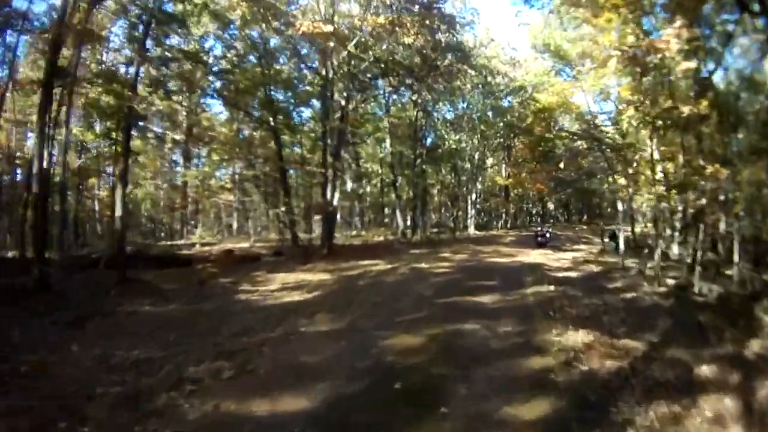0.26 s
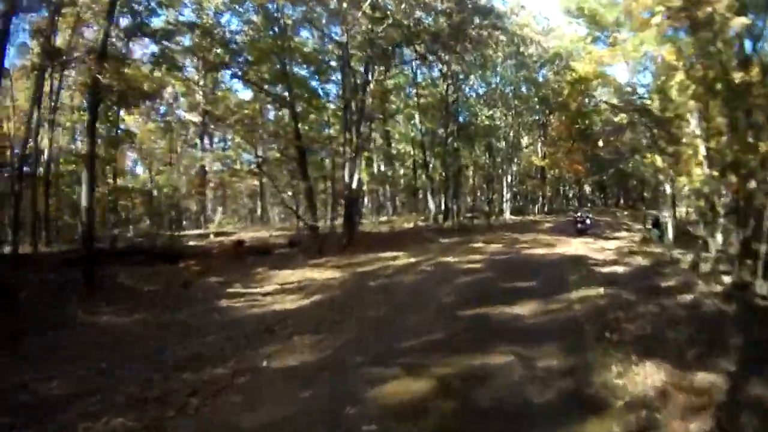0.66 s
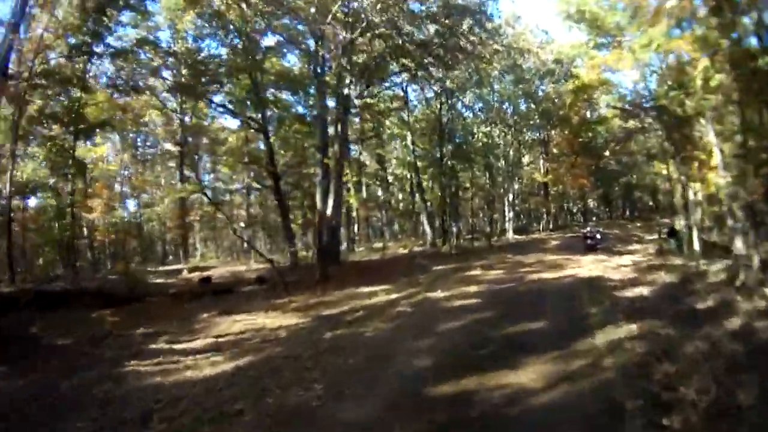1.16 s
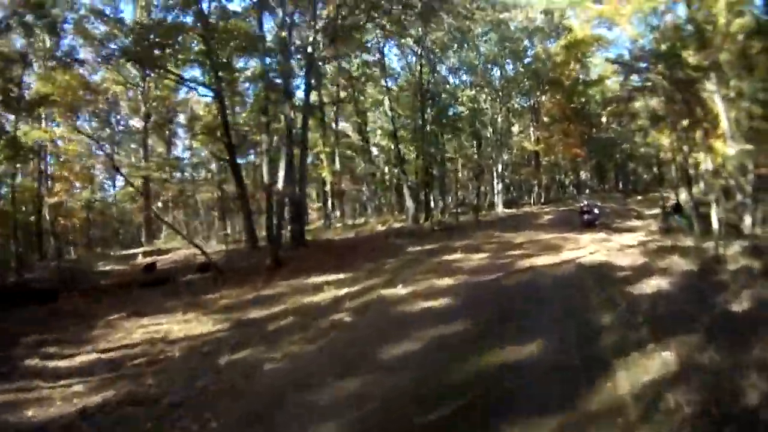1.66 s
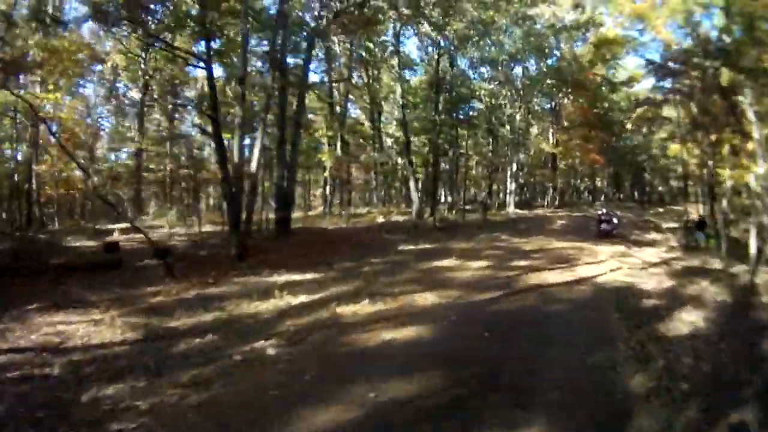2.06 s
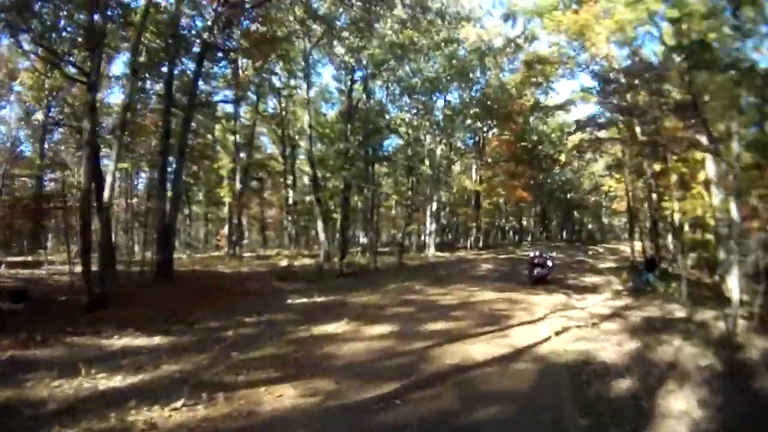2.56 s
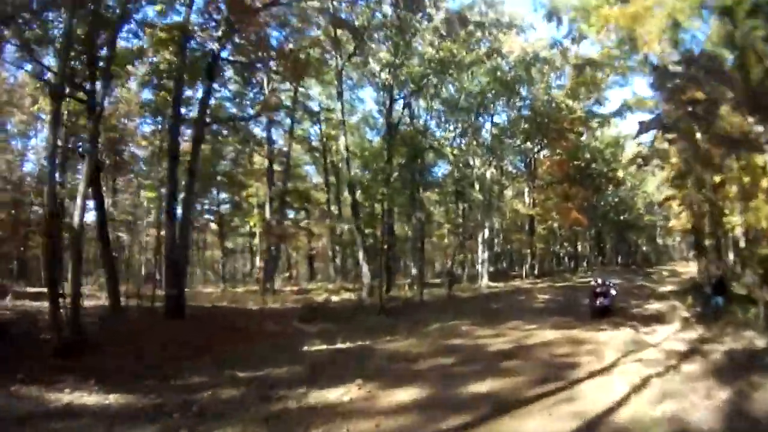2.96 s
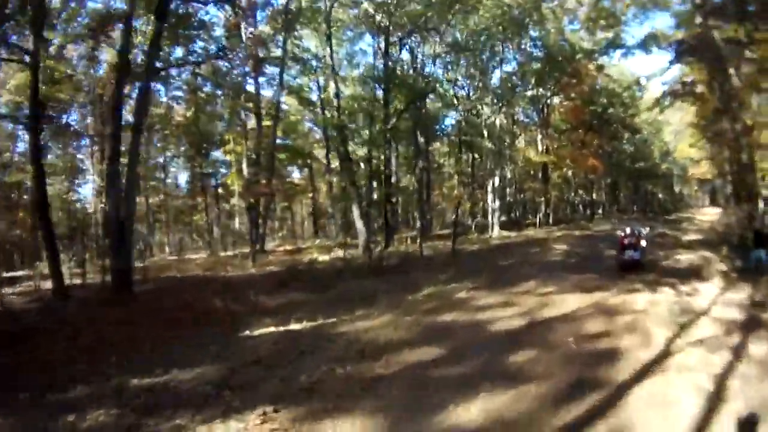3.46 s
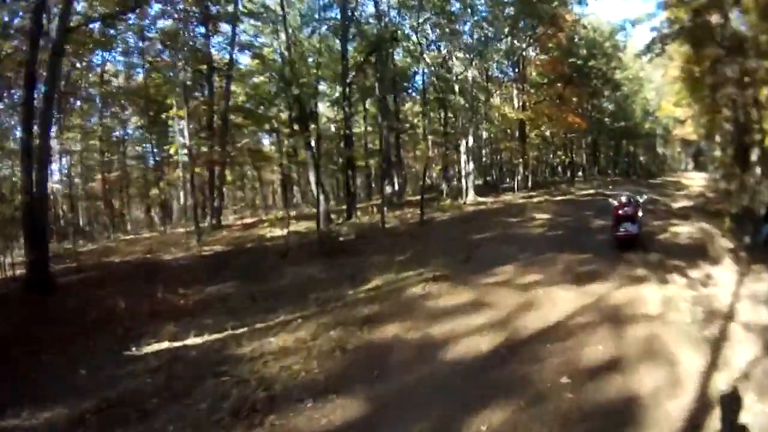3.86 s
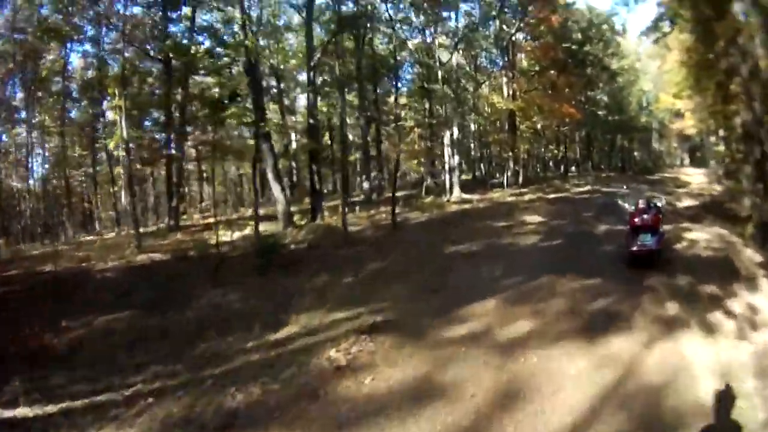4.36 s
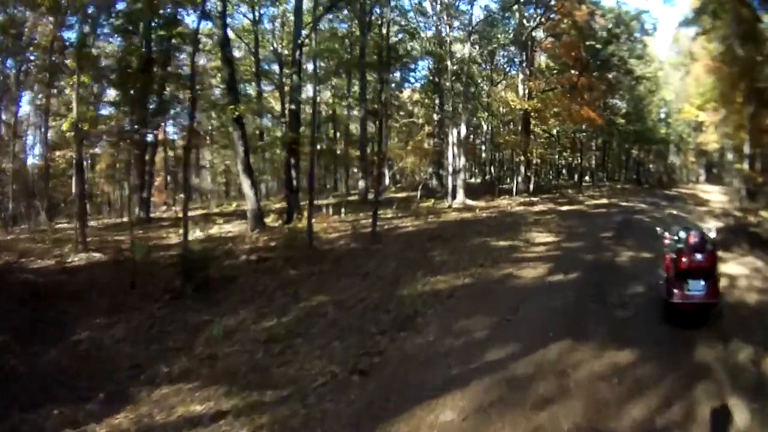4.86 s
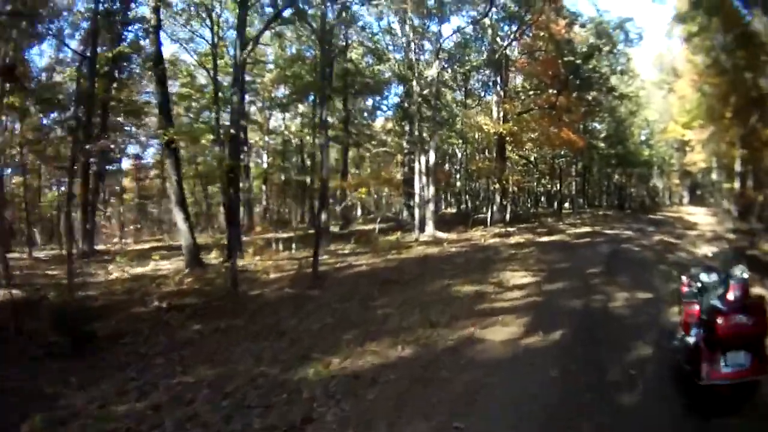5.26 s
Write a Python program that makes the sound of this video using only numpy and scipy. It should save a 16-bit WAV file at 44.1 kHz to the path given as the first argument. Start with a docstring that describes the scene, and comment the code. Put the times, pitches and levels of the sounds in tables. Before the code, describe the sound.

A bicycle rolls along a leafy dirt road in open woods, heard close from a camera carried on it. Low tyre drumming and leaf crunch start fairly quietly, then surge over rough patches from under one second to past two. A lull ends in a hard clack of loose parts near three seconds, with loud pebble knocks and leaf snaps, then calmer uneven rolling. Faint wind rumble and camera hiss lie underneath.

```python
"""The tyres of a bicycle drum over grit and crush dry leaves in surges on a dirt road in the woods,
heard from a camera that rides on it: dense random impacts excite the spectra of tyre and leaf.
Snapping leaves, pebbles, clacking loose parts and squeaks are short filtered or modulated events; ruts
give low pulses. Air rumbles on the microphone as shaped noise, and the camera adds hiss, a thin
steady whine and faint lens-motor buzzes below its band limit."""
import sys
import numpy as np
from scipy import signal
from scipy.fft import rfft, irfft, next_fast_len
from scipy.io import wavfile
from scipy.ndimage import map_coordinates

SR = 44100
rng = np.random.default_rng(int(sys.argv[2]) if len(sys.argv) > 2 else 0)


def int16_out(signal):
    """Quantize to a 16-bit WAV file."""
    q = np.round(np.clip(np.atleast_2d(signal).T, -1, 1) * 32767)
    wavfile.write(sys.argv[1], SR, q.astype(np.int16))


N = 242814  # length in samples

# Spectrum of crushed leaves. Each row: frequency in Hz, relative level in dB per Hz.
CRUNCH_SPECTRUM = [(200, -33.5), (700, 9.5), (1100, 0), (1450, 3.5), (1800, -3.5), (2200, -5.5),
                   (2520, -3.5), (2750, -11.5), (3050, -12.5), (3450, -23.5), (4100, -20), (5000, -33),
                   (9000, -37.5), (15000, -77)]
# Harder thrum of a loaded tyre. Each row: frequency in Hz, relative level in dB per Hz.
THRUM_SPECTRUM = [(100, -48), (300, -7), (470, 1), (620, 2.5), (800, -4), (1000, -13.5), (1400, -22),
                  (3000, -69.5)]


def amp(db):
    """Level to amplitude: 20 dB is a factor of ten."""
    return 10 ** (np.asarray(db) / 20)


def unit(x):
    """Normalisation to a root-mean-square value of 1."""
    return x / np.sqrt(np.mean(x ** 2) + 1e-20)


def curves(rows):
    """Linear interpolation in time: one value per sample for each column after the time."""
    times, *columns = np.transpose(rows)
    t = np.arange(N) / SR
    return [np.interp(t, times, column) for column in columns]


def wobble(rate):
    """Band-limited random modulation: a smooth curve through `rate` normal random knots a second."""
    knots = rng.standard_normal(int(N * rate / SR) + 4)
    return map_coordinates(knots, [np.arange(N) * rate / SR])


def causal(gain):
    """Minimum phase: folding the cepstrum gives a response that rings only after the blow."""
    cepstrum = irfft(np.log(gain + 1e-12))
    half = len(cepstrum) // 2
    cepstrum[1:half] *= 2
    cepstrum[half + 1:] = 0
    return np.exp(rfft(cepstrum))


def colour(x, points):
    """Linear filtering: a causal filter with the gain of (Hz, dB) points; the result has rms 1."""
    size = 2 * next_fast_len(N // 2 + 8192)
    point_hz, point_db = np.transpose(points)
    log_hz = np.log(np.fft.rfftfreq(size, 1 / SR) + 1)
    gain = amp(np.interp(log_hz, np.log(point_hz), point_db))
    filtered = irfft(rfft(x, size) * causal(gain), size)
    return unit(filtered[:N])


def grains(per_second, scatter_db):
    """Shot noise: tiny impacts at random moments, log-normal in size, of equal power at any density."""
    chance, size = rng.random(N), rng.standard_normal(N)
    sizes = rng.choice([-1, 1], N) * amp(scatter_db * np.clip(size, -2, 2))
    struck = chance < per_second / SR
    return unit(struck * sizes / np.sqrt(per_second))


def add(track, s, sound):
    """Superposition: a sound is summed into a track from time s in seconds."""
    start = max(round(s * SR), 0)
    track[start:start + len(sound)] += sound[:N - start]


def tyres(thrum_db=-7, thrum_growth=1.0, drum_flutter_db=.5, crunch_flutter_db=1.68):
    """Excitation and resonance: load makes grit impacts denser and thrum stronger; leaves crackle above."""
    # Drumming of tyre and frame. Each row: frequency in Hz, relative level in dB per Hz.
    drum_spectrum = [(20, -17.5), (70, -11), (130, -9.5), (220, 0.5), (330, 0.5), (480, 1.5), (640, -4.5),
                     (800, -14), (1000, -18.5), (1300, -27), (2200, -50.5), (5000, -85)]
    # Road between the rough patches. Each row: time in seconds, drumming in dB, extra leaf crunch in dB.
    dirt_road = [(0, -40.5, 0), (.25, -44.5, -2.5), (.4, -41, -1.5), (.62, -41.5, 0), (.95, -40.5, 5),
                 (1.4, -41.5, -1), (1.72, -40, -.5), (2.2, -42, 2), (2.4, -43, 4), (2.7, -43, 2),
                 (2.9, -42, 6), (3.2, -39, 3), (3.7, -39.5, -1), (4.2, -41, 1), (4.43, -42.5, -3),
                 (4.85, -40, -1.5), (5.1, -42, 1.5), (5.5, -44, 7.5)]
    crunch_average_db, crunch_growth = -58.5, 1.17  # at the average load; dB per dB of drumming

    dirt_db, cover_db = curves(dirt_road)
    rise_db, leafy_db = patches()
    drum_db = dirt_db + rise_db
    load_db = drum_db - drum_db.mean()
    load = amp(load_db)
    crunch_db = crunch_average_db + crunch_growth * load_db + cover_db + leafy_db

    grit = grains(1500 * load, scatter_db=1.0)
    stones = grains(800 * load, scatter_db=2.0)
    leaves = grains(2600 * load, scatter_db=6.5)

    thrum = amp(thrum_db) * load ** thrum_growth
    body = colour(grit, drum_spectrum) + thrum * colour(stones, THRUM_SPECTRUM)
    body = body / np.sqrt(1 + thrum ** 2)  # the mix of both keeps its power
    drumming = amp(drum_db + drum_flutter_db * wobble(28.01)) * body
    # the stones that thrum also crush the leaves beneath them
    crushed = colour(leaves + 0.77 * stones, CRUNCH_SPECTRUM)
    crunch = amp(crunch_db + crunch_flutter_db * wobble(45)) * crushed
    return drumming + crunch


def patches():
    """Load envelope: each patch shifts drumming and crunch in dB by a quick onset, a hold, a slower return."""
    # Rough, leafy patches of road. Each row: start in seconds, length up to the return in seconds,
    # rise of the drumming in dB, extra leaf crunch in dB.
    rough_patches = [(0.666, 0.075, 7, 1), (0.783, .3, 5.5, -3), (1.068, .27, 5, 2.5), (1.417, .19, 3.5, 4),
                     (1.789, 0.17, 2, 3.5), (1.959, .24, 6, 1.5), (3.004, .21, 4.5, 1.5), (3.26, .3, 4, 3),
                     (3.958, 0.04, 3, 3), (4.513, 0.22, 2.5, 3.5), (5.323, 0.11, 3, -8)]
    attack_s, release_s = 0.055, 0.11  # rolling onto a patch and off it
    t = np.arange(N) / SR
    rise_db, leafy_db = np.zeros(N), np.zeros(N)
    for s, length, db, extra_db in rough_patches:
        onset = (t - s) / attack_s
        fall = 1 - (t - s - length) / release_s
        on = np.clip(np.minimum(onset, fall), 0, 1)
        rise_db = np.maximum(rise_db, db * on)
        leafy_db += extra_db * on
    return rise_db, leafy_db


def snaps():
    """Brittle fracture: a leaf breaks in one impulse, filtered to a crack that stands out of the crunch."""
    # Single dry leaves snapping under the tread. Each row: time in seconds, peak level in dB.
    leaf_snaps = [(.8162, -39), (.888, -38.5), (0.933, -43), (1.1135, -39), (1.264, -40), (1.398, -45),
                  (1.4547, -41), (1.836, -39), (1.995, -43), (2.192, -47), (2.5834, -42), (2.7787, -48),
                  (3.1502, -35), (3.1681, -33), (3.1981, -40), (3.3193, -44), (3.398, -37), (3.444, -33),
                  (3.5568, -48), (4.6603, -48), (4.7275, -40), (5.1477, -45)]
    breaks = np.zeros(N)
    for s, db in leaf_snaps:
        add(breaks, s, amp([db]))
    cracks = colour(breaks, CRUNCH_SPECTRUM)
    return breaks.max() * cracks / np.abs(cracks).max()


def pebbles(tick_db=-11):
    """Impulse response: a single pebble knocks the tyre once and ticks against the ground."""
    # Pebbles struck by the tyre. Each row: time in seconds, peak level of the knock in dB.
    pebble_blows = [(.4645, -31.5), (.715, -31), (.720, -40), (.793, -27), (.915, -30), (1.2715, -35),
                    (1.3028, -45), (1.35, -25.5), (1.3986, -33), (1.468, -28.5), (1.496, -44),
                    (1.8385, -34), (1.9396, -30), (1.9818, -27), (2.216, -40), (3.0337, -30.5),
                    (3.1077, -23), (3.203, -22), (3.5608, -28), (3.9863, -31), (4.266, -32.5),
                    (4.3638, -31.5), (4.6774, -30), (4.7753, -32), (5.1861, -30.5), (5.365, -36),
                    (5.441, -29)]
    blows = np.zeros(N)
    for s, db in pebble_blows:
        add(blows, s, amp([db]))
    knock = colour(blows, THRUM_SPECTRUM)
    tick = colour(blows, CRUNCH_SPECTRUM)
    return blows.max() * (knock / np.abs(knock).max() + amp(tick_db) * tick / np.abs(tick).max())


def rattle(steepness=7, leak_db=-22, vary_db=0.3, scuff=0.067):
    """Modal resonance: a sharp, scuffing blow rings the modes in its range; high modes die sooner."""
    # Loose parts clacking. Each row: time in seconds, peak level in dB, lowest frequency in Hz,
    # highest frequency in Hz, 60 dB decay time in seconds at the middle of that range.
    clack_blows = [(0.026, -48, 2000, 2700, 0.024), (0.036, -48, 2030, 2600, 0.05),
                   (0.313, -44.5, 2200, 2900, 0.0074), (0.334, -48, 2000, 4800, .013),
                   (2.491, -51, 3300, 5200, .018), (2.8525, -34, 1280, 4900, 0.014),
                   (2.8533, -42, 3000, 3200, 0.02), (2.8786, -33.5, 3730, 3920, 0.018),
                   (2.879, -32.5, 1300, 2700, 0.023), (2.8846, -38, 1700, 5600, 0.012),
                   (2.9030, -30, 2000, 5200, 0.011), (2.905, -19.5, 563, 3500, 0.021),
                   (2.9105, -37, 1900, 4100, 0.021), (3.0636, -27, 6000, 9900, 0.005),
                   (3.0640, -23, 2200, 6500, 0.013), (3.8646, -51, 3900, 4700, .016),
                   (4.266, -37.5, 1600, 2510, 0.013), (4.2708, -46, 1700, 2600, .011),
                   (4.364, -43, 1200, 2400, 0.011), (4.583, -45.5, 1700, 2800, 0.018)]
    # Modes of the loose parts. Each row: frequency in Hz, relative level in dB.
    part_modes = [(580, 28), (780, 19), (1085, 15.5), (1292, 14), (1620, 10.5), (2130, 7.5), (2570, 8.5),
                  (3060, 3), (3700, -4), (3920, 5), (4450, -1), (4900, -3), (5480, -3), (6020, -1.5),
                  (7050, -3.5), (8240, -2), (9200, -2.5)]
    out, t = np.zeros(N), np.arange(SR // 10) / SR
    mode_hz, mode_db = np.transpose(part_modes)[:, :, None]
    hz = np.fft.rfftfreq(len(t), 1 / SR) + 1
    for s, db, low_hz, high_hz, t60 in clack_blows:
        life = t60 * np.sqrt(np.sqrt(low_hz * high_hz) / mode_hz)
        half_width = np.log(1000) / (2 * np.pi * life)  # in Hz: a shorter life is a broader resonance
        strength = amp(mode_db + vary_db * rng.standard_normal(mode_db.shape))
        mode_power = strength ** 2 / (1 + ((hz - mode_hz) / half_width) ** 2)
        body = np.sqrt(np.sum(mode_power, axis=0))
        reach = 1 / np.sqrt(1 + (low_hz / hz) ** (2 * steepness) + (hz / high_hz) ** (2 * steepness))
        tick = amp(leak_db) / np.sqrt(1 + (high_hz / hz) ** steepness)  # the higher modes sound faintly too
        contact = (t == 0) + scuff * rng.standard_normal(len(t)) * amp(-60 * t / t60)
        clack = irfft(rfft(contact) * causal(body * (reach + tick)))
        add(out, s, amp(db) * clack / np.abs(clack).max())
    return out


def squeaks(overtone_db=-18, overtone_ratio=1.58, steady=0.64):
    """Friction: each rub swells and fades as a gliding, grainy band with one weak upper partial."""
    # A part of the bicycle rubs. Each row: time of the crest in seconds, level in dB,
    # half length in seconds, frequency at the crest in Hz, glide in Hz per second, bandwidth in Hz.
    rubs = [(4.686, -56, 0.0021, 3860, 0, 299), (4.6892, -46, 0.002, 4100, -40000, 599),
            (4.6955, -56.5, 0.0028, 3880, 0, 300.3), (4.712, -57.5, 0.0033, 4500, 220000, 448)]
    out, t = np.zeros(N), np.arange(N) / SR
    for s, db, length, hz, glide, width_hz in rubs:
        phase = 2 * np.pi * (hz + glide * (t - s) / 2) * (t - s)
        grain = steady + unit(wobble(2 * width_hz)) + 1j * unit(wobble(2 * width_hz))
        partials = np.exp(1j * phase) + amp(overtone_db) * np.exp(1j * overtone_ratio * phase)
        swell = np.exp(-((t - s) / length) ** 2 / 2)
        out += amp(db) * swell * np.real(grain * partials)
    return out


def thuds():
    """Transient force: each rut gives a low push, a sine under a bell-shaped envelope."""
    # Wheels dropping into ruts. Each row: time of the crest in seconds, peak level of the envelope in dB,
    # frequency in Hz, half length in seconds.
    rut_drops = [(0.191, -39, 84.5, .022), (0.317, -40.5, 55.6, .03), (2.315, -39, 125, 0.018),
                 (2.367, -41, 88, .028), (2.496, -39, 52.4, .013), (2.607, -39.5, 71.6, .028),
                 (2.726, -39, 61, .022), (2.96, -42, 59, .022), (2.962, -38.5, 134.6, 0.0175),
                 (3.807, -35, 66, .017), (3.901, -40, 93.4, 0.028), (4.119, -44, 84, .025),
                 (4.882, -44, 69.5, 0.023)]
    out, t = np.zeros(N), np.arange(SR // 5) / SR
    for s, db, hz, length in rut_drops:
        push = np.sin(2 * np.pi * hz * t) * np.exp(-(t / length - 2) ** 2)
        add(out, s - 2 * length, amp(db) * push)
    return out


def wind(gust_db=0.54, gusts_per_s=9):
    """Flow noise: passing air rumbles on the microphone as low-frequency noise in uneven lumps."""
    # Rumble of the air. Each row: frequency in Hz, relative level in dB per Hz.
    rumble_spectrum = [(10, -16), (22, -23), (40, -4.5), (70, -3.5), (110, -4), (170, -6), (300, -22),
                       (700, -43.5), (2000, -109)]
    # Strength of the air. Each row: time in seconds, level in dB.
    wind_levels = [(0, -46), (.5, -50.5), (2.0, -49), (2.2, -43), (2.55, -50), (2.95, -48.5), (3.3, -51),
                   (3.9, -45.5), (4.6, -49.5), (5.0, -45.5), (5.5, -46.5)]
    wind_db, = curves(wind_levels)
    gusts = amp(wind_db + gust_db * wobble(gusts_per_s))
    return gusts * colour(rng.standard_normal(N), rumble_spectrum)


def camera(run_length=0.0092, length_spread=0.28, drift_hz=110):
    """Self-noise: steady hiss, a pure electronic whine and lens-motor buzzes of random length and pitch."""
    # Steady hiss. Each row: frequency in Hz, relative level in dB per Hz.
    hiss_spectrum = [(100, -0.5), (1500, 13), (2500, 16.5), (3400, 8.5), (4150, 12.5), (5000, 5),
                     (5700, 4.5), (6350, 6), (7200, 3.5), (8400, 4.5), (10000, 1), (12600, 1), (13600, -9),
                     (15000, -15)]
    # Tone of the lens motor. Each row: frequency in Hz, relative level in dB.
    lens_spectrum = [(3000, -37), (5800, -6), (6350, -6), (6900, -8), (7700, -14), (8450, 4), (9000, -18),
                     (9600, -8), (10500, -19), (14500, -12.5)]
    # Steps of the lens motor, each a short buzz. Each row: time of the crest in seconds, level in dB.
    motor_steps = [(.174, -68), (.356, -70), (.476, -70), (.661, -71), (.868, -70), (1.166, -71),
                   (1.266, -68), (1.466, -71), (1.661, -69), (1.77, -68), (2.101, -67), (2.264, -68),
                   (2.367, -68.5), (2.564, -72), (2.776, -69), (3.265, -69.5), (3.375, -70), (3.668, -70),
                   (3.764, -68), (3.968, -69), (4.271, -71), (4.366, -70), (4.576, -66.5), (4.773, -66),
                   (4.873, -70), (5.182, -69.5), (5.272, -72)]
    whine_hz = 11089
    t = np.arange(N) / SR
    lengths = run_length * np.exp(length_spread * rng.standard_normal(len(motor_steps)))
    running = np.zeros(N)
    for (s, db), length in zip(motor_steps, lengths):
        running += amp(db) * np.exp(-((t - s) / length) ** 2 / 2)
    # a turning phase shifts the whole band up and down in frequency
    drift = np.exp(2j * np.pi * np.cumsum(drift_hz * wobble(11)) / SR)
    motor = signal.hilbert(colour(rng.standard_normal(N), lens_spectrum))
    lens = running * np.real(motor * drift)
    whine = amp(-84) * np.sin(2 * np.pi * whine_hz * t)
    hiss = amp(-66.5) * colour(rng.standard_normal(N), hiss_spectrum)
    return hiss + whine + lens


def scene():
    """Superposition: the pressures of all sources add at the one microphone."""
    road = tyres() + snaps() + pebbles()
    bicycle = rattle() + squeaks() + thuds()
    return (road + bicycle + wind() + camera())[None]


def record(dry):
    """Band limitation: the camera keeps nothing from its upper limit upwards."""
    top_hz = 15050
    size = next_fast_len(N + 8192)
    kept = np.fft.rfftfreq(size, 1 / SR) < top_hz
    return irfft(rfft(dry, size) * kept, size)[..., :N]


dry = scene()
out = record(dry)
int16_out(out)
```